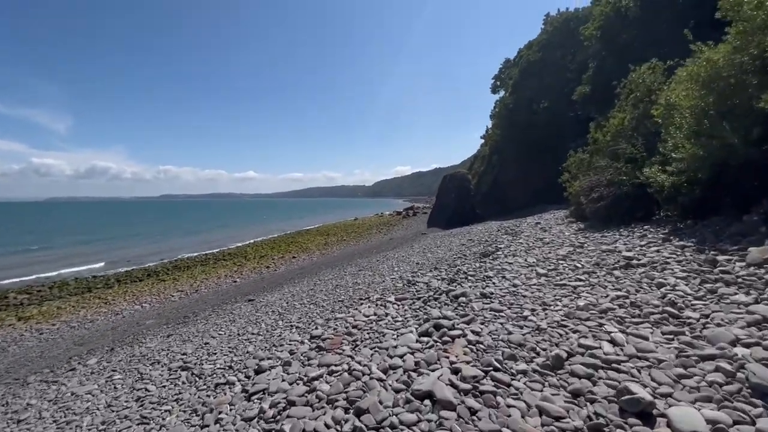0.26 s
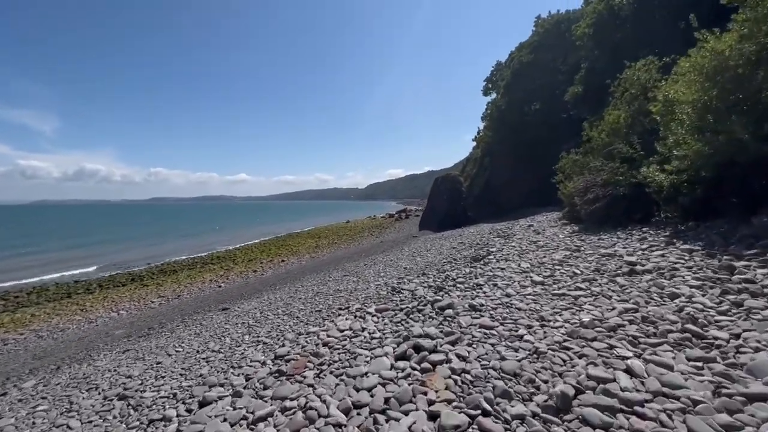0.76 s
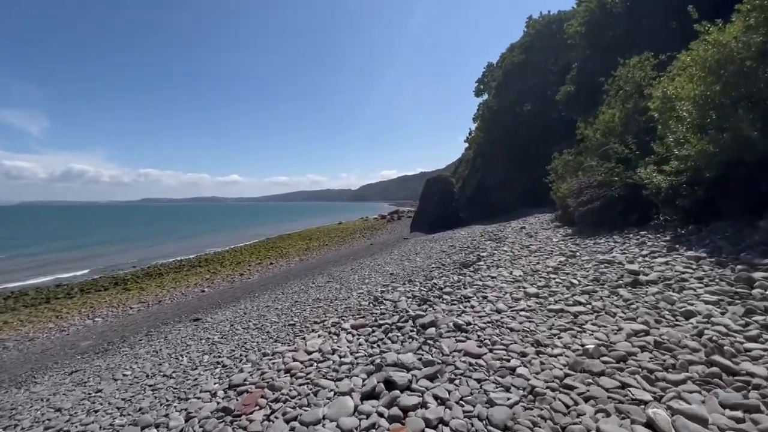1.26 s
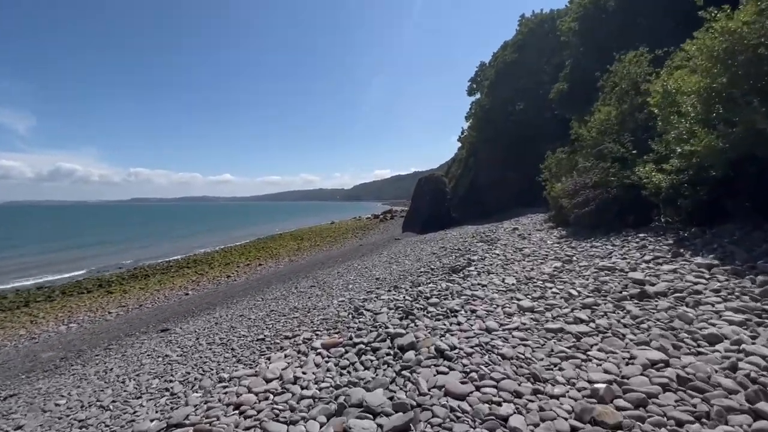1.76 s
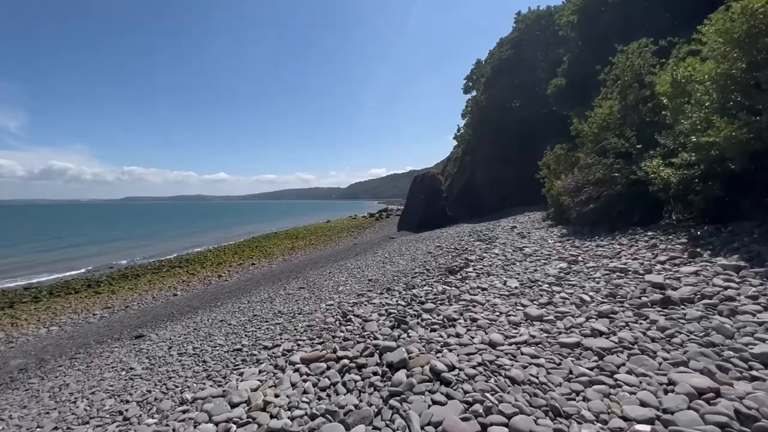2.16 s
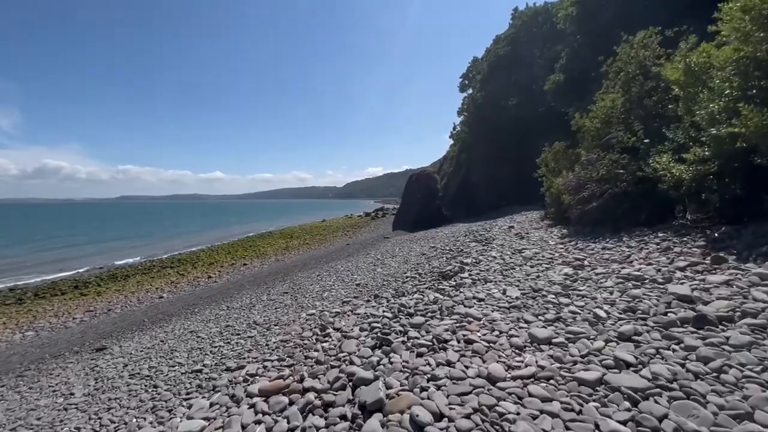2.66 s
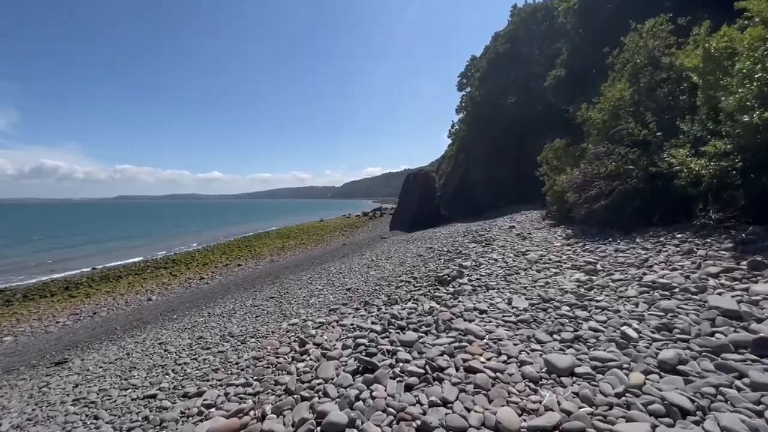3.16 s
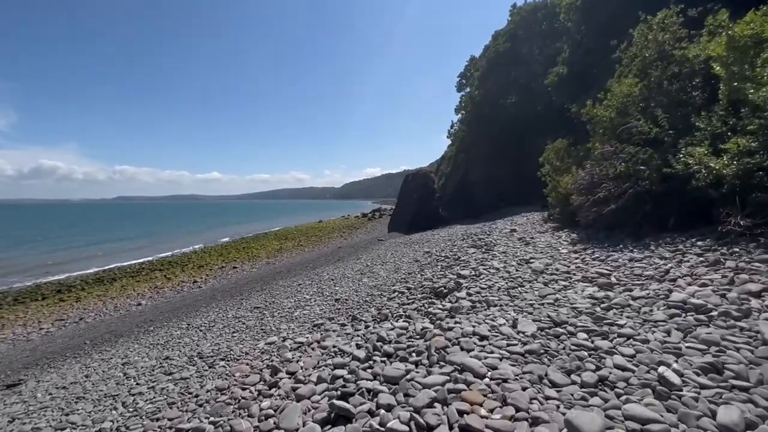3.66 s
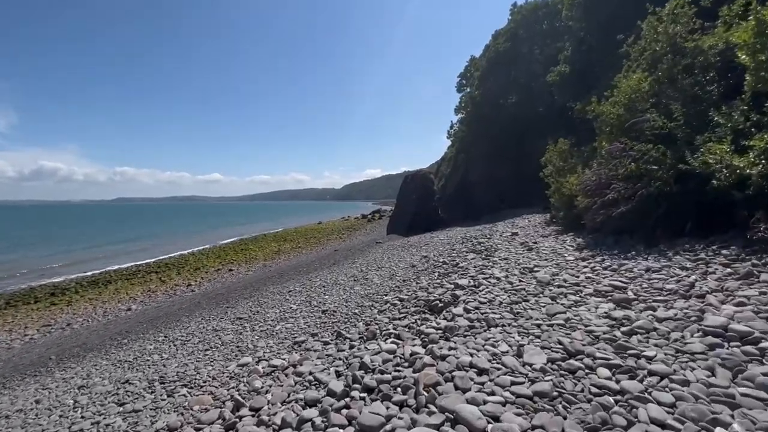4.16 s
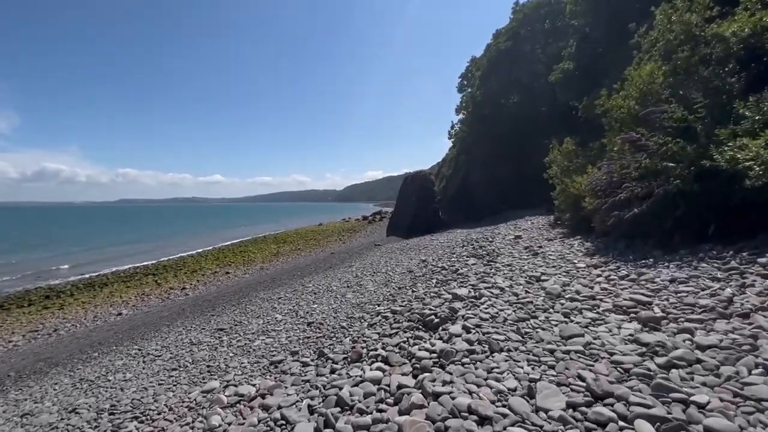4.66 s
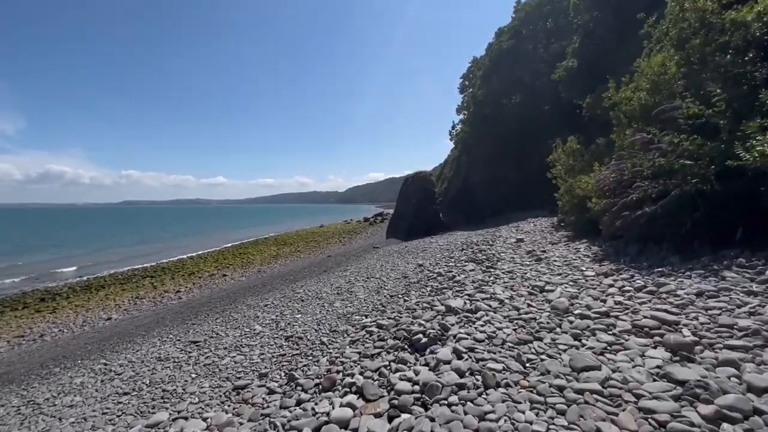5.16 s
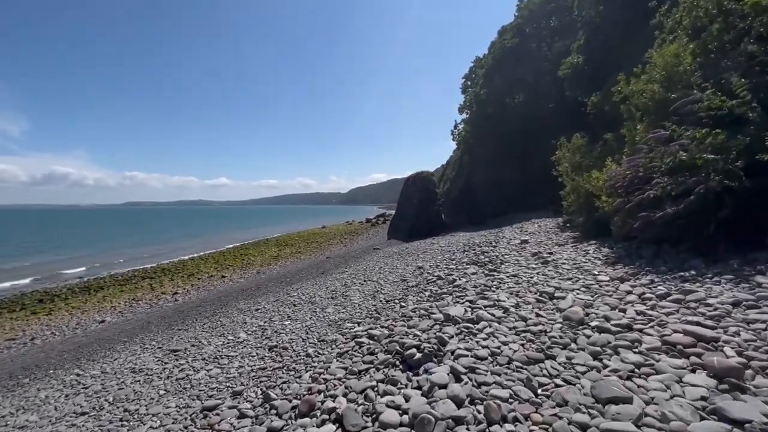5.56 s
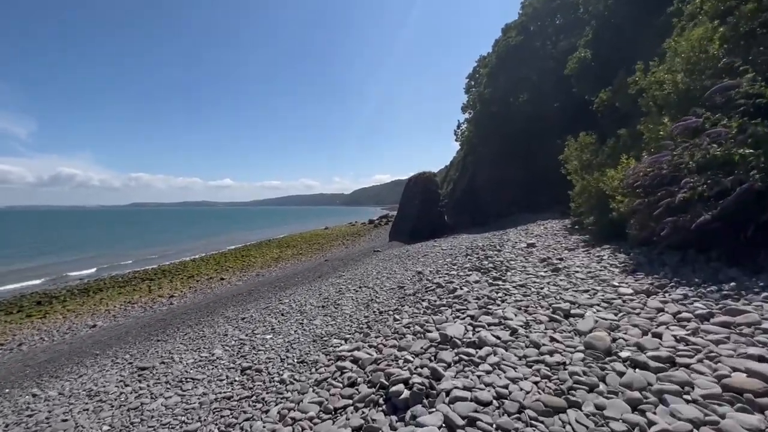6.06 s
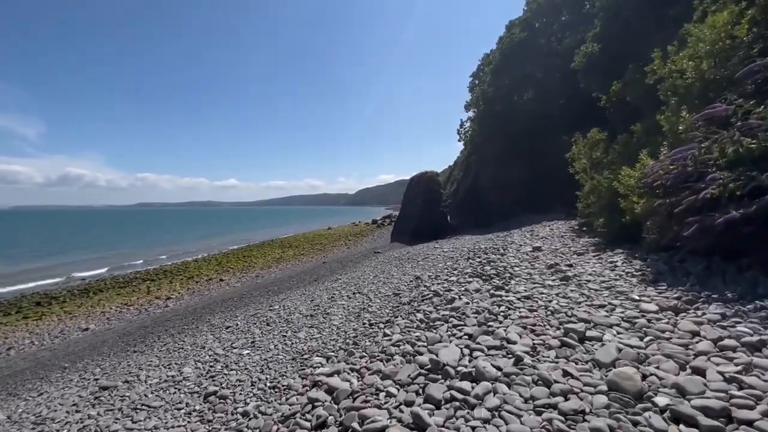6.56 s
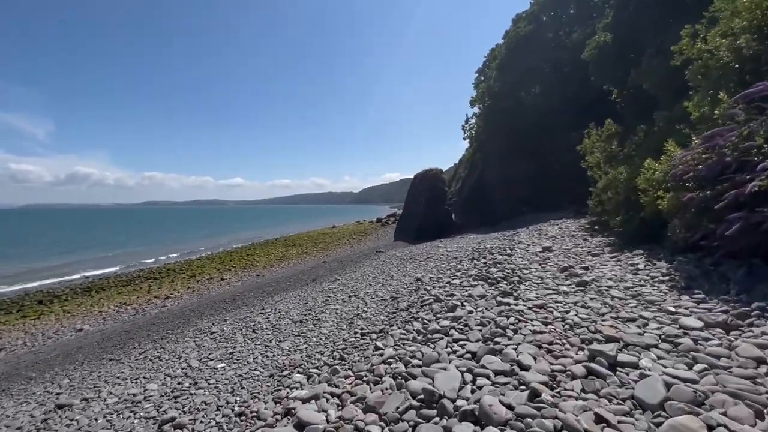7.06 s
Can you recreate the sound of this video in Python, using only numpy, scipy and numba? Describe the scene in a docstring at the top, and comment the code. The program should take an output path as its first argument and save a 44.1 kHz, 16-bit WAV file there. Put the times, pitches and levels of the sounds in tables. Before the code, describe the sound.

On an open pebble beach, someone walks over large rounded stones holding a phone. Steps land about every 0.6 seconds, near 0, 0.7, 1.3, 1.9, 2.5, 3.1, 3.7, 4.4, 5.0, 5.6, 6.2 and 6.8. Each is a short, dry crunch over a dull thud, with hard mid-pitched stone clacks, rapid chatter and brief scrapes; little pebbles tick in its wake. The steps around 1.3 and 1.9 are softer; from 3.7 to 4.6 the clacking is dense, and around 5.3 to 5.8 stones rattle in a longer cluster. Sharp clacks come at 6.2 and 6.8, the latter with tiny high pings. A faint, steady wash of small waves sits behind, left-leaning, fuller from about 4.3 to 6. Low wind flutters and thumps on the microphone, gusting near 0.7, knocking at 3.8, and most insistent from 5.9 to the end at 7.3.

```python
"""A beach of large round pebbles: someone walks along it, a phone in hand. Each press of the foot is a crunch
of thousands of short ringing contacts over a dull noise rumble; single stones slip, clack and scrape as
bursts of decaying sines, small pebbles tick over and a few hard ones ping. Small waves on the left are
filtered noise; a breeze buffets the microphone ports as fluttering low noise with short thumps."""
import sys
import numpy as np
from scipy import signal
from scipy.fft import rfft, irfft, next_fast_len
from scipy.io import wavfile
from scipy.ndimage import uniform_filter1d
from numba import njit

SR = 44100
rng = np.random.default_rng(int(sys.argv[2]) if len(sys.argv) > 2 else 0)


def waveform_to_disk(signal):
    """Save audio, clipped to [-1, 1], as 16-bit WAV at the path in sys.argv[1]."""
    frames = np.transpose(np.atleast_2d(signal))
    scaled = np.clip(frames, -1, 1) * 32767
    samples = np.round(scaled).astype(np.int16)
    wavfile.write(sys.argv[1], SR, samples)


def to_linear_factor(level_db):
    """Convert decibel levels (scalar or array-like) to linear amplitude factors."""
    exponent = np.asarray(level_db, float) / 20
    return 10 ** exponent


N = 323253
TIME = np.arange(N) / SR

# Bands in which noise levels are set
WIND_HZ, BODY_HZ, FOAM_HZ = (40, 300), (600, 4000), (4000, 9000)

# Ringing modes of a pebble. Each row: frequency as a multiple of the pitch, relative level in dB, nominal t60 in ms.
PEBBLE_MODES = [(0.648, 0.5, 7.6), (0.998, 3, 7.8), (1.4, 3.5, 4.5), (2.1, -3.5, 5.8)]


def butter(order, hz, kind="lowpass"):
    """Butterworth sections."""
    return signal.butter(order, hz, kind, fs=SR, output="sos")


def colour(x, points, scale=1):
    """Filters by (Hz, dB) points joined on a log frequency axis."""
    hz, db = np.transpose(points)
    size = next_fast_len(N)
    log_hz = np.log(np.arange(size // 2 + 1) * SR / size + 1)
    gain = to_linear_factor(scale * np.interp(log_hz, np.log(hz), db))
    return irfft(rfft(x, size) * gain, size)[..., :N]


def shade(x, balance):
    """Half of the left-minus-right balance lifts the left port, half dims the right."""
    return np.array([colour(port, balance, side / 2) for port, side in zip(x, (1, -1))])


def unit(x, lo_hz, hi_hz):
    """Scales so that the given band of the channel mean has rms 1."""
    band = signal.sosfilt(butter(4, [lo_hz, hi_hz], "bandpass"), np.mean(x, axis=0))
    return x / np.std(band)


def walk(rate_hz):
    """Random levels, each held 1 / rate_hz, smoothed twice and softly bounded at +-2."""
    k = int(SR / rate_hz)
    held = np.repeat(rng.standard_normal(N // k + 1), k)
    smooth = uniform_filter1d(uniform_filter1d(held, k), k)[:N]
    return 2 * np.tanh(smooth * 0.536)


@njit
def rings(length, rate, start, hz, t60, size, rise):
    """Sum of dying sines, each started at its own fractional sample and swelling in over the contact time."""
    out = np.zeros(length)
    for k in range(len(start)):
        pole = 2j * np.pi * hz[k] / rate - np.log(1000) / (t60[k] * rate)
        first = int(np.ceil(start[k]))
        z = size[k] * np.exp(pole * (first - start[k]))
        turn = np.exp(pole)
        shut = 1.
        for i in range(max(first, 0), min(first + int(t60[k] * rate), length)):
            shut *= rise[k]
            out[i] += z.imag * (1 - shut)
            z *= turn
    return out


def contacts(s, hz, t60_s, size, lag_s, pan_db):
    """Both ports hear every contact, the right one lag_s later and pan_db weaker than the left."""
    hz = np.clip(hz, 50, 15000)
    rise = np.exp(-hz / (.35 * SR))  # deeper contacts swell in more slowly
    return np.array([rings(N, 1. * SR, (s - side * lag_s / 2) * SR, hz, t60_s,
                           size * to_linear_factor(side * pan_db / 2), rise) for side in (1, -1)])


def surf(lag_samples=18):
    """Wash and foam: noise reaching the left port first, plus independent noise at each port."""
    # Each row: time in s, nominal wash level in dB, nominal foam hiss level in dB.
    surf_levels = [(0.0,-39.5,-56),(.4,-46.5,-54.5),(1.22,-44.5,-56),(1.83,-47.5,-56.5),(3.05,-44.5,-56.5),(3.66,-43,-53),(4.28,-40.5,-53.5),(4.89,-39,-50),(5.5,-39,-51),(6.11,-39,-49),(7.33,-43,-51)]
    # Noise filter. Each row: frequency in Hz, gain in dB.
    wash_colour = [(150, -9), (250, -6.5), (470, 2.5), (800, 10), (1110, 6), (1400, 7.5), (2000, 3),
                   (2900, -2), (3900, -11.5), (5200, -13), (7000, -17.5), (9000, -22), (11000, -35.5),
                   (14500, -29)]
    s, wash_db, foam_db = np.transpose(surf_levels)
    near, left, right = rng.standard_normal((3, N))
    sea = colour(np.array([near + 1.17 * left, np.roll(near, lag_samples) + 2.0 * right]), wash_colour)
    low = signal.sosfilt(butter(3, 3500), sea)
    high = signal.sosfilt(butter(3, 3500, "high"), sea)
    # the lower and upper wash swell each on their own
    deep = signal.sosfiltfilt(butter(2, 1100), low)
    low = deep * to_linear_factor(1.4 * walk(4.13)) + (low - deep) * to_linear_factor(2.5 * walk(8))
    wash = unit(low, *BODY_HZ) * to_linear_factor(np.interp(TIME, s, wash_db) + 1.3 * walk(16))
    foam = unit(high, *FOAM_HZ) * to_linear_factor(np.interp(TIME, s, foam_db) + 0.67 * walk(7.4))
    return (wash + foam) * to_linear_factor(0.96 * walk(2.55) - 0.87)


def thumps(count=8):
    """The strongest eddies: each a few swings of the membrane, at pitches spread widely around its own."""
    # Each row: peak time in s, nominal peak level in dB, central pitch in Hz.
    puffs = [(0.617,-28,152),(1.97,-27,158),(2.335,-35,170),(2.367,-29,152),
             (3.177,-25,185),(3.799,-18.5,265),(3.878,-25,162),(5.019,-24,135),
             (6.071,-25,152),(6.229,-21.5,150),(6.332,-23,219),(6.387,-22,133),(6.572,-29,92.5),(6.833,-24.5,195),(6.925,-27.5,111),
             (7.033,-25.5,103),(7.074,-22,201),(7.284,-25,169)]
    peak_s, peak_db, hz = np.array(puffs).T[..., None]
    chance = rng.random((len(puffs), count, 3))
    start = (peak_s - .011 + 0.01227 * chance[..., 0]) * SR
    pitch_hz = (hz * np.exp(1.57 * (chance[..., 1] - .5))).ravel()
    size = to_linear_factor(peak_db + 10.5) * np.sign(chance[..., 2] - .5)
    rise = np.exp(-pitch_hz / (.8 * SR))
    return rings(N, 1. * SR, start.ravel(), pitch_hz, 4.5 / pitch_hz, size.ravel(), rise)


def wind():
    """Eddies flutter and thump on the ports; the right one gets them weaker, with drifting phase."""
    # Each row: time in s, nominal gust level in dB.
    gusts = [(0.0,-40.5),(.3,-53.5),(.5,-50),(.68,-33),(.95,-51.5),(2.1,-45.5),(2.5,-41.5),(2.75,-53.5),(3.2,-49.5),(4.2,-48),(4.8,-47),(5.0,-38),(5.28,-38.5),(5.45,-50),(5.52,-50),(5.78,-42),(5.9,-35.5),(6.17,-41),(6.36,-35),(6.52,-43.5),(6.62,-36),(6.71,-52),(6.78,-33),(7.08,-34.5),(7.17,-45),(7.33,-33.5)]
    # Noise filter. Each row: frequency in Hz, gain in dB.
    buffet_colour = [(12, -75), (30, -20), (55, 0.5), (90, 1.5), (222, -4.5), (400, -11.5), (600, -32.5),
                     (780, -51), (1320, -120)]
    brightening = 0.15  # dB above 180 Hz per dB of gust
    s, db = np.transpose(gusts)
    flutter = np.array([to_linear_factor(2.9 * walk(40)) * rng.standard_normal(N) for _ in range(2)])
    flutter = unit(colour(flutter, buffet_colour), *WIND_HZ)
    gust_db = np.interp(TIME, s, db) + 3.9 * walk(28)  # passing eddies lift and brighten the band
    low = signal.sosfiltfilt(butter(2, 180), flutter)
    treble_gain = to_linear_factor(brightening * (gust_db - np.mean(gust_db)))
    left, right_own = to_linear_factor(gust_db) * (low + treble_gain * (flutter - low))
    left = left + thumps()
    phase = np.cumsum(walk(2.907)) * 4.4 / SR + 2.3
    swept = signal.hilbert(left, next_fast_len(N))[:N] * np.exp(1j * phase)
    return np.array([left, to_linear_factor(-10.0) * (swept.real + 1.9 * right_own)])


def load_db():
    """Heel, ball or toe loads the bed at one dB rate, holds, settles at another; presses add in power."""
    # Each row: time of full load in s, hold in s, nominal crunch level in dB.
    presses = [(0.026,0.084,-33),(0.133,0.05,-38.5),(0.679,0.1,-28.5),(1.307,0.042,-32.5),(1.402,0.11,-43),(1.922,0.068,-33.5),(2.017,0.043,-38.5),
               (2.524,0.0088,-24.5),(2.556,0.026,-32),(3.105,0.0072,-25.5),(3.161,0.031,-32.5),(3.735,0.077,-30.5),(3.889,0.014,-32.5),(4.396,0.044,-29),(4.458,0.11,-38),
               (5.006,0.019,-34.5),(5.065,0.0089,-34),(5.172,0.033,-41.5),(5.33,0.24,-42),(5.575,0.13,-29),(6.188,0.0092,-32.5),(6.26,0.018,-33.5),(6.807,0.011,-33),
               (6.882,0.056,-29.5)]
    load_db_per_s, settle_db_per_s = 447, 342
    s, hold_s, db = np.array(presses).T[..., None]
    t = TIME[::32]
    db = db - load_db_per_s * np.maximum(s - t, 0) - settle_db_per_s * np.maximum(t - s - hold_s, 0)
    power = np.sum(to_linear_factor(np.maximum(db, -120)) ** 2, axis=0)
    return np.interp(TIME, t, 20 * np.log10(np.sqrt(power)))


def crunch(weight_db, count=30000):
    """Thousands of short contacts a second in the bed; the foot's weight sets level, and harder is brighter."""
    # Bed filter. Each row: frequency in Hz, gain in dB.
    bed_colour = [(120, -41), (200, -27), (400, -21.5), (532, -10), (1180, -0.5), (2320, -2), (4650, -15.5),
                  (6520, -14.5), (9990, -31.5), (11900, -23.5), (14000, -66)]
    chance = rng.random((count, 6)).T
    hz = 300 * 40 ** chance[1]
    size = to_linear_factor(-3.0 * np.log(chance[2] + 0.0012)) * np.sign(chance[3] - .5) * np.sqrt(hz)
    lag_s = -.00007 + 0.00027 * (chance[4] - .5)
    pan_db = 2.0 * (chance[5] - .5)
    grit = contacts(chance[0] * N / SR, hz, 14.2 / hz + 0.0005, size, lag_s, pan_db)
    grit = unit(colour(grit, bed_colour), *BODY_HZ) * to_linear_factor(5.2 * walk(95))
    low = signal.sosfilt(butter(2, 3800), grit)
    return to_linear_factor(weight_db) * (low + to_linear_factor(0.36 * weight_db + 14.0) * (grit - low))


def thud(weight_db):
    """The bed gives under the foot with a dull, uneven noise rumble, stronger at the left port."""
    rumble = signal.sosfilt(butter(2, [70, 520], "bandpass"), rng.standard_normal((2, N)))
    rumble = unit(rumble, *WIND_HZ) * to_linear_factor(np.array([[3.], [-3.]]))
    return rumble * to_linear_factor(-18 + 1.05 * weight_db + 7.3 * walk(40))


def shifting(weight_db, count=500):
    """Lone small pebbles tick over at random times, louder in the decaying wake of a press."""
    base_db, db_per_wake_db, tail_s = -10, 2, 0.21
    fade = np.exp(-1 / (tail_s * SR))
    wake = signal.lfilter([1 - fade], [1, -fade], to_linear_factor(weight_db))
    wake_db = 20 * np.log10(wake + to_linear_factor(-57))
    chance = rng.random((count, 5)).T
    s = chance[0] * (N - 1) / SR
    ratio, mode_db, t60_ms = np.array(PEBBLE_MODES).T[..., None]
    db = base_db + db_per_wake_db * np.interp(s, TIME, wake_db) - 7.2 * np.log(chance[1] + .01) + mode_db
    hz = 1200 * 2.8 ** chance[2] * ratio
    lag_s, pan_db = 0.00023 * (chance[3] - .5), 5.0 * (chance[4] - .5)
    return contacts(*[np.ravel(v + 0 * db) for v in (s, hz, t60_ms / 1000, to_linear_factor(db), lag_s, pan_db)])


def touches(rows, slip_share, count=16, lead=4):
    """A stone slips in with growing touches, knocks, then chatters to rest; each touch rings modes and a tick."""
    side_modes_per_db, dull_limit_db = 1.07, -17.5  # duller knocks leave more to the main mode
    knock_db = 6.5  # the touch at the peak is firmer than its neighbours
    # axes: stone, touch, mode (the last one is the tick)
    s, db, hz, treble_db, chatter_ms = np.array(rows)[:, :, None, None].transpose(1, 0, 2, 3)
    slip_ms = slip_share * chatter_ms
    ratio, mode_db, t60_ms = np.transpose(PEBBLE_MODES)
    chance = rng.random((len(rows), count, len(ratio) + 1, 6))
    place = np.arange(count)[:, None] - lead + chance[:, :, :1, 0]
    before = np.maximum(-place, 0) / lead
    after = 2.5 * (np.maximum(place, 0) / (count - lead)) ** 1.2
    when_s = s - .0006 + (after * chatter_ms - before * slip_ms) / 1000 + 0.0008 * chance[..., 1]
    # touches far apart overlap less, so each must be firmer for the same loudness
    spread_ms = np.maximum(np.where(place < 0, 2.85 * slip_ms, chatter_ms), .5)
    firm_db = 10 * np.log10(spread_ms / 4) - 2.2 * before - 4.75 * after
    firm_db = firm_db + knock_db * (np.floor(place) == 0)
    # later touches stray further in pitch; dull stones keep theirs and ring longer
    dull_db = np.minimum(treble_db - dull_limit_db, 0)
    stone_stray = 0.18 * (chance[:, :1, :-1, 1] - .5)
    touch_stray = (0.15 + 0.32 * after) * to_linear_factor(0.32 * dull_db) * (chance[..., :-1, 2] - .5)
    mode_hz = hz * ratio * np.exp(stone_stray + touch_stray)
    tick_hz = 4200 * 2.29 ** chance[..., -1:, 2]
    pitch_hz = np.concatenate([mode_hz, tick_hz], axis=2)
    ring_db = mode_db + side_modes_per_db * dull_db * np.abs(np.log2(ratio)) + 0 * after
    tick_db = treble_db + 2.0 - 0.64 * after
    tone_db = np.concatenate([ring_db, tick_db], axis=2)
    size = to_linear_factor(db + tone_db + firm_db + 5.64 * (chance[..., 3] - 1.725)) * np.sign(chance[..., 5] - .5)
    t60_s = np.append(t60_ms, 4.0) / 1000 * to_linear_factor(-.08 * dull_db)
    lag_s = -.00007 + 0.00025 * (chance[..., 4] - .5)
    pan_db = 2.4 * (chance[:, :1, :1, 0] - .5)
    return contacts(*[np.ravel(v + 0 * when_s) for v in (when_s, pitch_hz, t60_s, size, lag_s, pan_db)])


def clacks():
    """Stones that slip in briefly, then knock and chatter."""
    # Each row: peak time in s, nominal peak level in dB, pitch in Hz, relative tick level in dB, chatter scale in ms.
    clack_rows = [(.0398,-12,1750,-26,1.35),(.0455,-18,2140,-8.5,8.7),(0.0605,-11.5,1870,-21.5,4.7),(0.0873,-18.5,1650,-19,15),(.125,-29,3230,-32,2),(.1558,-22,1390,-13,11),
                  (.6905,-8,1885,1.5,9),(.713,-18,1040,-14,3.7),(0.7568,-10,2280,-3,3.6),(0.8073,-23.5,1970,-16,12.2),(.819,-22,990,-17,6.8),(.888,-28.5,1310,-32,7.3),
                  (0.9765,-17.5,2120,-34,3.5),(1.2724,-18.5,1930,-20,2),
                  (1.306,-32,1490,-3,4.5),(1.325,-17,1290,-26,10.3),(1.3438,-20.5,1630,-7,10),(1.3616,-23,1670,-6,3.7),(1.4322,-13,1480,-19,6.7),
                  (1.926,-30.5,3740,-12,3.8),(1.933,-19.5,1100,-19,7),(1.9505,-19,1310,-19,3.5),(1.973,-19.5,1230,-14,7.2),(1.997,-24,1380,-6,4.5),(2.031,-34,1880,-14,2.2),(2.0505,-24,1700,-3,4.3),(2.3,-29.5,1540,-12,3.9),
                  (2.4592,-14,1690,-11,5.95),(2.4937,-25,2670,-32,4.5),(2.5224,-9,1970,-0.5,6.5),(2.534,-17,1740,4,3.5),(2.5549,-15,1830,-20,10.3),
                  (2.5745,-11.5,2600,-24,3.3),(2.616,-24,1420,-22,3),(3.042,-22.5,1570,-30,8.6),(3.073,-23,2340,1,2.4),
                  (3.0814,-20.5,1820,-4,6.2),(3.1088,-9.5,1680,1,5.6),(3.159,-27,3330,-8,2.3),(3.2186,-20.5,1750,-28,3.7),(3.238,-25,2420,-30,2.8),
                  (3.714,-24.5,1820,0,5.3),(3.7327,-27,3050,-23,4.3),(3.77,-20.5,1780,-12,6.1),(3.7923,-9.5,1900,-4,4.24),
                  (3.807,-20,1930,-20,7.9),(3.8145,-27,3770,-6,3),(3.8234,-23,2050,-18,5.4),(3.8418,-40,4200,12,5.9),(3.8709,-14.5,1660,-14,4),(3.8886,-12,1500,-4,4.2),
                  (3.9928,-20.5,1670,-9,3.6),(4.0113,-16.5,1300,-15,3.2),(4.0855,-24.5,1880,-23,3),(4.118,-21,1330,-21,6.1),
                  (4.16,-20.5,1470,-13,4.8),(4.3208,-21.5,1380,-27,5.4),(4.3586,-13,1640,-3.5,7.2),(4.3973,-12,2910,-3,4.9),(4.4271,-10.5,1920,3,2.13),
                  (4.468,-13.5,1480,-7.5,3.2),(4.485,-13.5,1610,-23,2.5),(4.495,-21,2310,-22,3.2),(4.513,-18,1400,-18,3.4),(4.6282,-21,1940,-25,3),(4.643,-22.5,2550,-12,3.1),(4.9813,-14,4130,0.5,3.2),
                  (5.077,-26.5,3700,-2,4.6),(5.165,-13,1630,-22,3.44),(5.188,-16,1580,-16,3.35),(5.342,-18,1490,-33,5.2),
                  (5.36,-23,1220,-17.5,18),(5.383,-22,1300,-24,5.2),(5.424,-18,1100,-24,4.1),(5.475,-27.5,1200,-1.5,4.9),(5.522,-19,1090,-39,9.9),(5.5407,-12.5,2110,1,7),(5.576,-11,1390,-17,11.8),(5.605,-10,1950,-1.5,7.1),(5.617,-16.5,2420,-16,6.2),(5.651,-17,1540,-3,14.7),
                  (5.6886,-7,1740,-19,1.48),(5.699,-15,1760,-22,5.8),(5.7691,-21.5,1180,-8.5,5.8),(5.9357,-19.5,2030,-25,3.1),(5.948,-23.5,2140,-8,4.5),(5.9997,-20.5,2200,-18,1.74),
                  (6.1655,-7,1690,-4.5,8.1),(6.2112,-22,1410,-16,2.9),(6.797,-22,2470,-30,1.7),(6.8115,-7,2470,-32,3.26),
                  (6.9258,-12,1780,-21.5,9.4),(6.952,-37,2570,-23,5),(6.964,-26,2000,-12,3)]
    return touches(clack_rows, 0.2)


def scrapes():
    """Stones that grind up to their peak through a longer slip."""
    # Each row: peak time in s, nominal peak level in dB, pitch in Hz, relative tick level in dB, chatter scale in ms.
    scrape_rows = [(.5729,-24.5,2020,-24,5.8),(1.2171,-24.5,1110,-10.5,9.7),(1.246,-24,1580,-26,7),(1.4918,-33,1780,-13,6),
                   (1.576,-23.5,1980,-23,7.7),(1.9105,-26.5,1200,-24,12),(1.9622,-22.5,910,-10,9.9),(2.0178,-28,1810,-11,6.3),(3.1018,-22,2150,3,11),(3.1842,-8,1510,-29,2.9),
                   (3.7527,-18.5,1520,-13,4.5),(4.378,-17.5,1380,-55,13),(4.4595,-18,2320,-7,3.8),(5.0227,-16,1160,-19.5,6.4),(5.072,-19.5,1180,-24,8.4),(6.2605,-17.5,1820,-12,6.7),(6.8745,-24,1840,0,6.7),(6.899,-17,2400,-9,7.8)]
    return touches(scrape_rows, .75)


def pings():
    """One thin, fading tone for each small hard stone."""
    # Each row: start in s, nominal peak level in dB, pitch in Hz, t60 in ms.
    ping_rows = [(1.432, -38, 7900, 33), (6.811, -18.5, 8250, 18), (6.823, -24, 4980, 11),
                 (6.881, -19, 5100, 10), (6.921, -19.5, 6800, 9)]
    s, db, hz, t60_ms = np.transpose(ping_rows)
    return contacts(s, hz, t60_ms / 1000, to_linear_factor(db), 0 * s, 0 * s)


def scene():
    """Feet below the phone, sea to the left, wind on the ports."""
    # Shading by the phone body. Each row: frequency in Hz, left minus right in dB.
    feet_balance = [(400, -9), (800, 2.5), (1300, 2.5), (2400, 8.5), (4400, 15.5), (8000, 6.5), (12000, -6)]
    sea_balance = [(300, 4), (700, 9), (1300, 6), (2400, 7.5), (4400, 11), (7500, 14), (12000, 0)]
    weight_db = load_db()
    stones = clacks() + scrapes() + shifting(weight_db) + pings()
    stones = signal.sosfilt(butter(2, 500, "high"), stones)
    # rounded stones radiate little at the very top
    stones = signal.sosfilt(butter(5, 8800), stones)
    feet = shade(stones + crunch(weight_db), feet_balance) + thud(weight_db)
    return feet + shade(surf(), sea_balance) + wind()


def band_limit(x):
    """A steep low-pass at the top of the band."""
    return signal.sosfilt(signal.butter(12, 17130, fs=SR, output="sos"), x)


def record(dry):
    """The phone rounds the hardest peaks and dulls the top."""
    rounded = np.tanh(dry)
    dulled = signal.sosfilt(butter(3, 11500), rounded)
    return band_limit(dulled)


dry = scene()
out = record(dry)
waveform_to_disk(out)
```